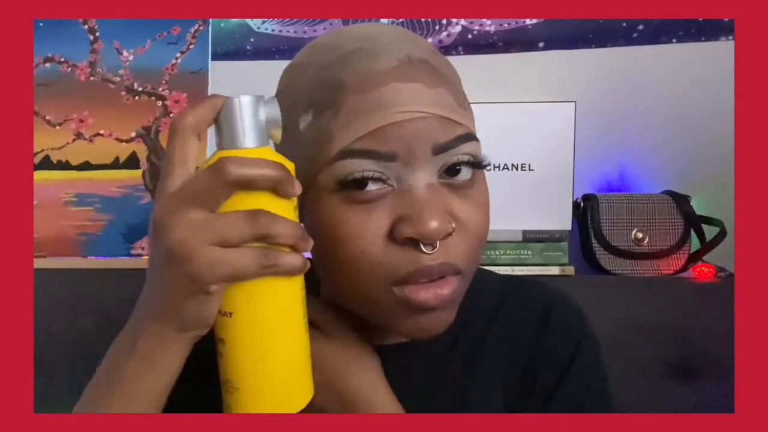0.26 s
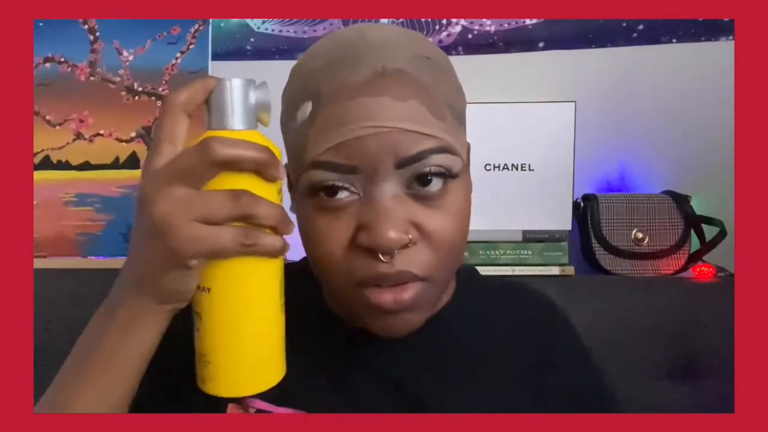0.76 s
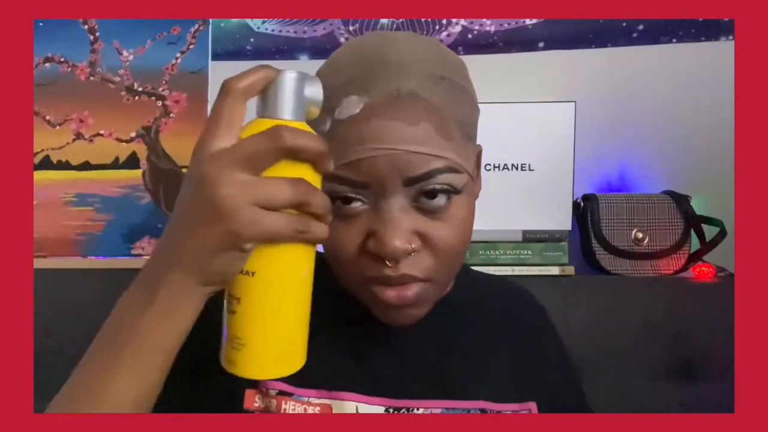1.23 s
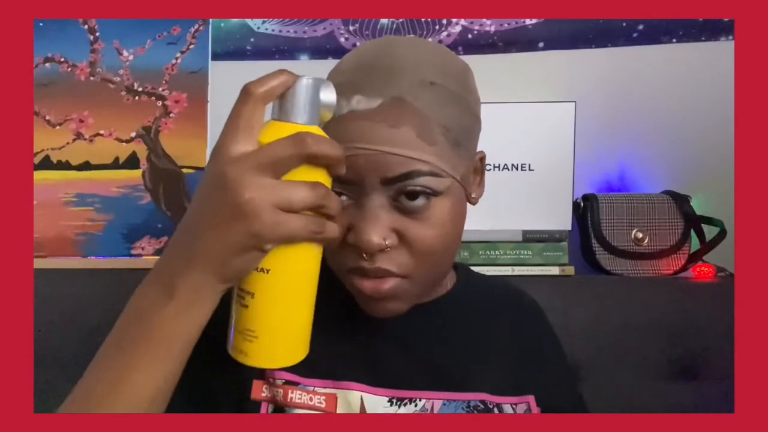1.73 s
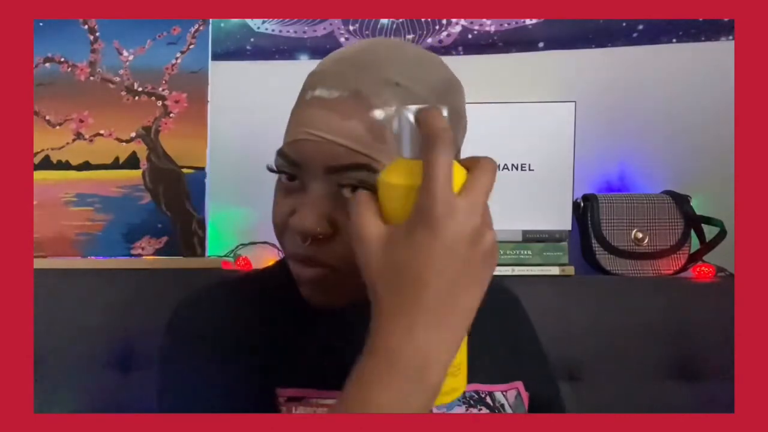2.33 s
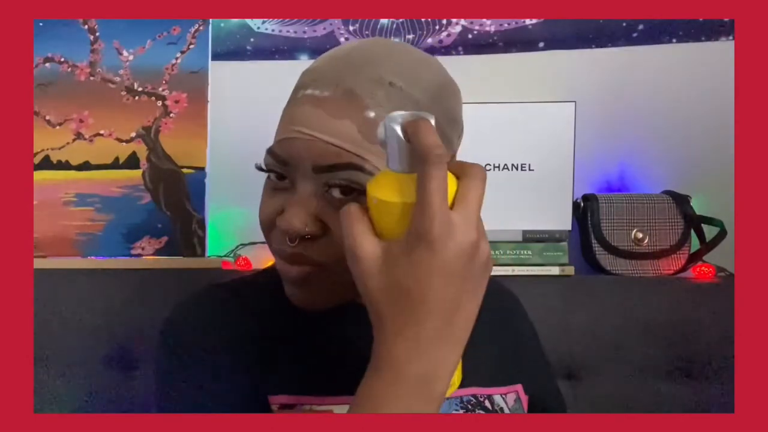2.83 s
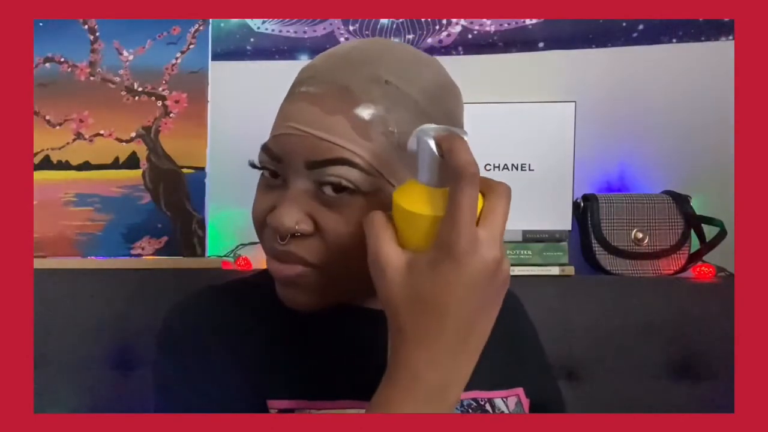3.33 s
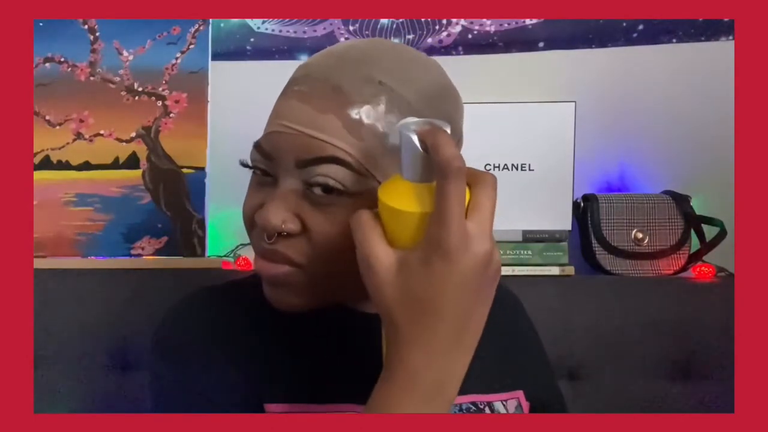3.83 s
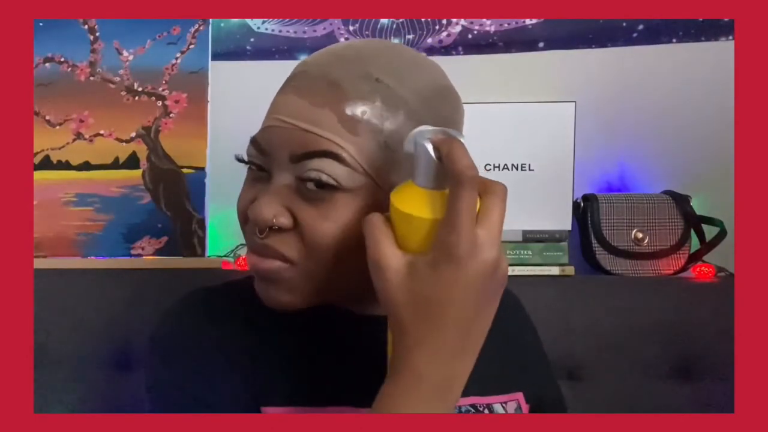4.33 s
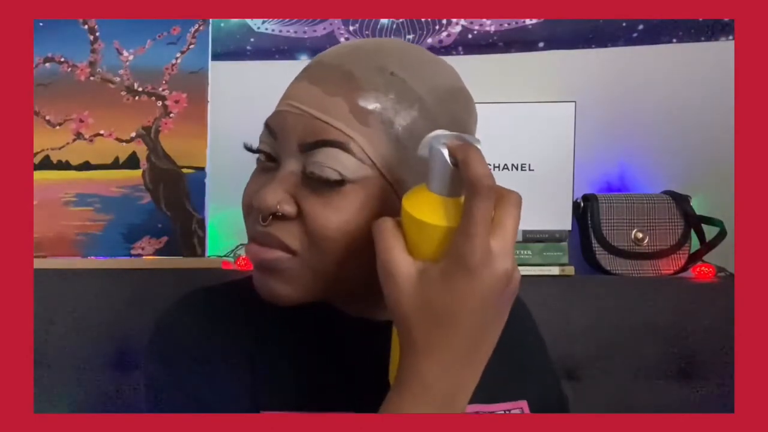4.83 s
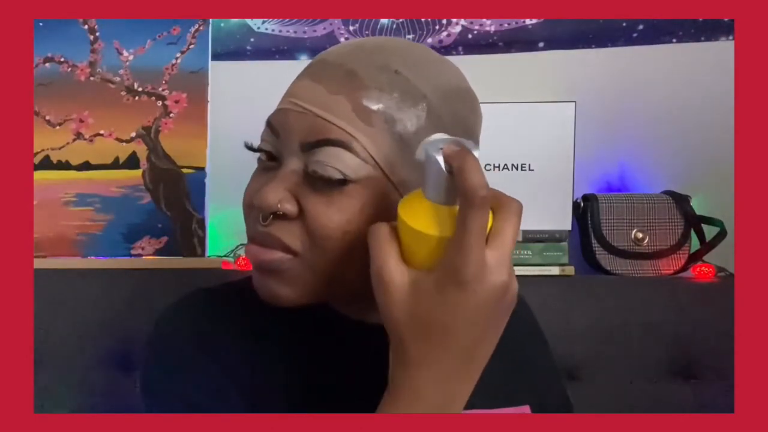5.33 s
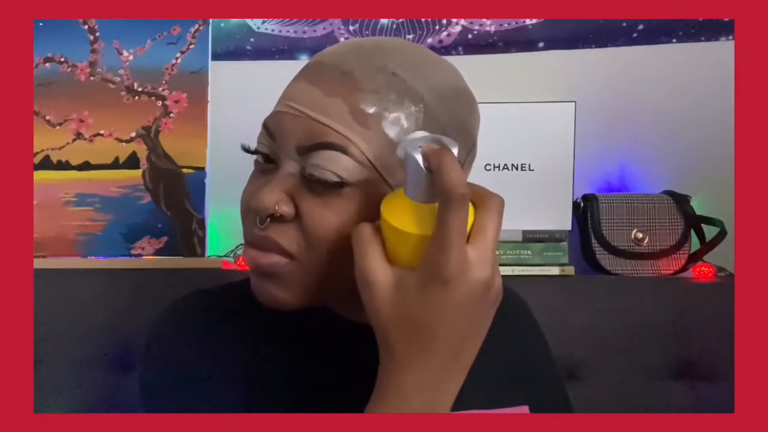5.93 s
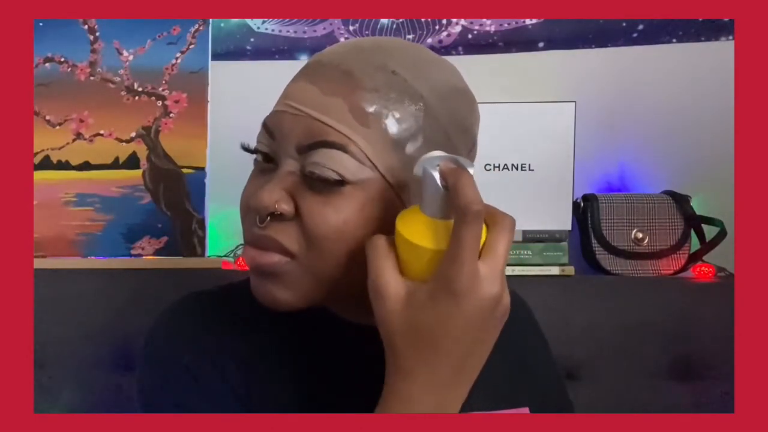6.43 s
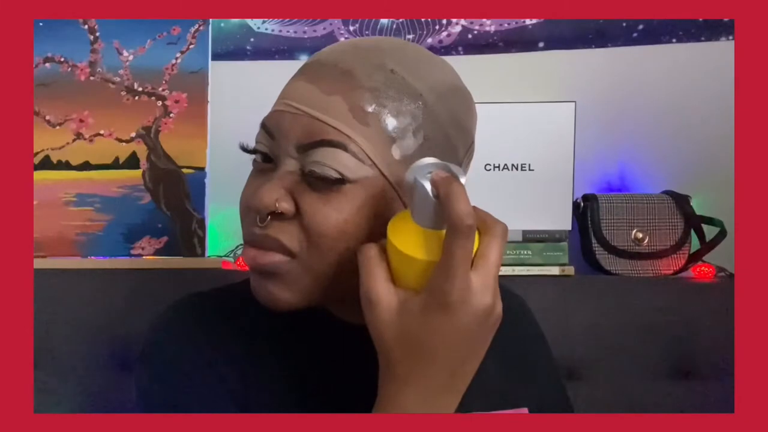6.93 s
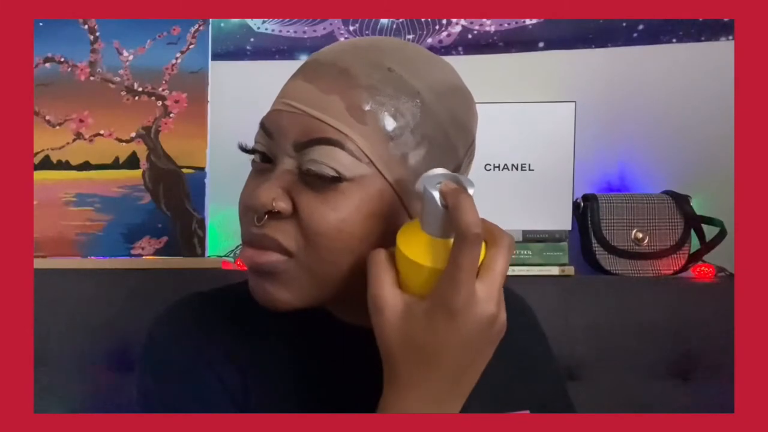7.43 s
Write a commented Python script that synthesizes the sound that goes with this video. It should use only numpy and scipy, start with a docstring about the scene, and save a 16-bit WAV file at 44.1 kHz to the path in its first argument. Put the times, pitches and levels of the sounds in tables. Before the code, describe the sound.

An aerosol can sprays in rapid short hissing spurts, close by in a quiet room, with a few faint finger ticks.

```python
"""An aerosol can sprayed in quick short spurts against a head, close to a pair of microphone ports. Each press
opens the valve at once: the nozzle hisses and sizzles, then the jet swells and roars on the scalp, and the
hollow under the button rings. The hand carries the can across the head, then lowers it towards the ear; button
and fingers tick on the can. The place is a quiet furnished room with a low rumble; once, after a knock, the can
rings on with a faint low tone."""
import sys
import numpy as np
from scipy import signal
from scipy.fft import rfft, irfft
from scipy.io import wavfile

SR = 44100
rng = np.random.default_rng(int(sys.argv[2]) if len(sys.argv) > 2 else 0)


def pcm_store(signal):
    """Save signal as 16-bit PCM."""
    levels = np.round(np.clip(np.atleast_2d(signal), -1, 1) * 32767)
    wavfile.write(sys.argv[1], SR, levels.astype(np.int16).T)


N = 338688

# Presses of the button. Each row: start in seconds, hiss at the opening in dB, swell time in seconds,
# swollen hiss in dB, seconds until the finger lifts, sag until then in dB, roar top against hiss in dB,
# share of the press at which the roar tops, sizzle against hiss in dB, then dB for each aim band.
BUTTON_PRESSES = [(-0.06, -55, 0.037, -40, 0.15, 4.5, -3.5, 0.75, -5, -5.5, -1, -3),
                  (0.238, -61, 0.036, -51, 0.11, 6.5, -8.5, 0.98, -4.5, -1, -3, -1),
                  (0.425, -54, 0.031, -41, 0.14, 2, -1.5, 0.48, -4, -4.5, -1, 2),
                  (0.696, -62, 0.039, -63.5, 0.051, 9.0, -17.5, .5, -3, -2.5, 6.5, -3),
                  (0.857, -55, 0.043, -37.5, 0.17, 3.5, -5.5, 0.39, -5, 6, 9.5, 4),
                  (1.126, -51.5, 0.063, -45, 0.12, 1, -2.5, 0.61, -4, 0, 5, 2.5),
                  (1.365, -58, 0.05, -43, 0.15, 4.5, -1, 0.65, -2.5, -2.3, 2, 4),
                  (1.624, -56, 0.054, -43, 0.13, 2, -2.5, 0.69, -5, -0.5, 1.5, 5),
                  (1.865, -59.5, 0.048, -49.5, 0.12, -3.5, 0.5, 0.96, -4, -6.5, -1.5, 2),
                  (2.246, -62.5, 0.067, -44, 0.14, 6.5, -6.5, 0.66, -7, -7, -1, 6.5),
                  (2.561, -59, 0.069, -47, 0.13, 4, -6, .8, -6, -9.5, -5.5, -2),
                  (2.897, -59.5, 0.048, -40.5, 0.14, 4.5, -3.1, 0.57, -4.5, -8.5, -3, 4),
                  (3.197, -58.5, 0.077, -52.5, 0.13, 3, -6.5, 0.71, -0.5, -1.5, 0.5, 1),
                  (3.424, -61, 0.05, -45.5, 0.16, 0, -0.3, 0.59, -5, -3.5, 0, 7),
                  (3.712, -62, 0.061, -42, 0.18, 3.5, -1.5, 0.52, -4.5, -4, -1, 5),
                  (4.041, -58, 0.069, -46, 0.13, 1.5, -2.5, 0.84, -1.5, -3.5, -3, 3),
                  (4.299, -59.5, 0.063, -40, 0.14, 2, -5, 0.65, -10.5, 4, 3, 3),
                  (4.582, -58, 0.06, -52.5, 0.16, -4.5, -0.5, 0.92, -3, 0, 3, 0.5),
                  (4.99, -47, 0.065, -42.5, 0.15, 3, -0.6, 0.39, -7.5, 1, 5, 3),
                  (5.294, -57.5, 0.078, -41, 0.17, 4.5, -4, 0.64, -4.5, 0.3, 0, 4),
                  (5.566, -52.5, 0.048, -39, 0.15, 2, -4.5, 0.57, -10, 2, 0, 4.5),
                  (5.846, -54, 0.06, -36.5, 0.14, 5.5, -8, 0.71, -10.5, 0.5, -4, 2.5),
                  (6.122, -52.5, 0.062, -36.5, 0.15, 3.5, -6.5, 0.57, -11, 0, 0, 4),
                  (6.4, -54.5, 0.045, -39.5, 0.17, 0, -2.5, 0.47, -7.5, 2, 2, -1),
                  (6.705, -55.5, 0.045, -39, 0.18, 2, -5.5, 0.64, -5, 1.5, 2.5, -6.5),
                  (7.118, -47.5, 0.13, -37, 0.17, 4.5, -7, 0.83, -5, 3, 1, -1),
                  (7.423, -56, 0.051, -39.5, 0.15, 1.5, -2.5, 0.65, -3.5, -1.5, 0, 0.5)]
# Colour of the spray at close range. Each row: frequency in Hz, level in dB.
SPRAY_SPECTRUM = [(100, -19.5), (200, -13.5), (300, -8), (500, -6), (800, -1.5), (1750, -3.5),
                  (2000, -10.5), (2600, -11.5), (4100, -6), (5600, -0.5), (6550, -2.1), (7200, 0.38),
                  (8000, -1.4), (8700, 2), (10100, 1), (11300, 2.5), (13400, -3.5), (15500, -0.5)]
# Narrow steady peaks that colour the spray's roar and hiss. Each row: centre in Hz, width in Hz,
# boost in dB.
SPRAY_PEAKS = [(317, 12, 3), (474, 25, 3), (592, 18, 4), (820, 60, 2), (1007, 22, 2.5), (1117, 22, 3),
               (1581, 40, 4), (5500, 90, 1.5), (7294, 60, 2)]
# Bands that change with the aim of each press. Each row: centre in Hz, width in Hz.
AIMED_BANDS = [(7250, 440), (5670, 700), (334, 170)]
# The can crosses the head. Each row: time in seconds, place from 0 (near side) to 1 (far side).
CAN_PATH = [(0, 0.015), (1.2, 0.051), (2, 0.36), (2.6, 0.72), (4.3, 0.73), (6, 1), (7.68, 1)]
# The can sinks towards the ear. Each row: time in seconds, lowering from 0 to 1.
CAN_LOWERING = [(5.9, 0.23), (6.9, 0.28), (7.5, 0.78)]
# Bands that change as the can moves. Each row: centre in Hz, width in Hz, near-side gain in dB,
# far-side gain in dB, dB added when fully lowered.
MOVING_BANDS = [(3370, 700, 3, 1.5, -8), (4470, 720, -1.1, 0.05, -1), (5800, 820, 1.2, 0.2, -1.5),
                (8800, 560, -2.5, -1.5, -9), (11100, 800, -1.5, -2.6, -12), (14500, 2700, -6.5, -3.5, 6)]
# Phase lead of the jet at the right port. Each row: frequency in Hz, radians with the can at the
# near side, radians at the far side.
JET_LEAD = [(0, 0, 0), (1000, .25, .75), (2070, .3, 1.65), (3100, .2, 3.0), (4100, 1.2, 3.0),
            (4800, 2.5, 3.2), (5500, 2.5, 3.3), (6200, 2.1, 5.0), (6500, 1.6, 6.1), (6900, 1.1, 6.5),
            (7600, .25, 6.4)]
# The direct jet at the two ports. Each row: frequency in Hz, likeness from 0 to 1.
JET_LIKENESS = [(100, .6), (400, 0.66), (1000, 0.84), (2000, 0.48), (3100, 1), (4100, 0.61), (5500, 0.87),
                (6300, 0.6), (6900, 0.9), (7600, 0.83)]
# Stereo image of the treble. Each row: frequency in Hz, phase lead of the right side in radians,
# likeness between left and right from 0 to 1.
TREBLE_IMAGE = [(7600, .15, .95), (7750, 0, .993), (8250, 0, .993), (8500, -.5, .92), (8800, -.8, .88),
                (9300, -1.8, .8), (9850, -3.14, 1), (10800, -3.14, 1), (11600, -4.6, .75),
                (12300, -6.0, .97), (12600, -6.28, .9995), (13400, -6.28, .9995), (13700, -6.5, .97),
                (14200, -7.6, .6), (14900, -9.42, .995), (16000, -9.42, 1)]
# Button and fingers on the can. Each row: start in seconds, peak in dB, centre in Hz, decay in ms.
CAN_TICKS = [(.38, -49, 7000, 2), (0.401, -54.5, 890, 16), (0.857, -41, 1510, 3.7), (1.108, -49, 2000, 8.4),
             (2.156, -64.5, 5990, 5.3), (2.488, -61, 640, 13), (2.497, -64, 9000, 3.0),
             (2.512, -65, 590, 12), (2.53, -75, 9000, 3.0), (2.769, -51, 8000, 11), (3.279, -43, 490, 10),
             (4.83, -48, 8000, 4), (4.977, -59, 1500, 8.1), (5.833, -51, 6000, 6), (6.106, -52.5, 6000, 15),
             (7.119, -41.5, 1440, 3.8)]
# The faint low tone after a knock. Each row: time in seconds, level in dB.
DRONE_LEVEL = [(3.28, -100), (3.3, -76), (3.5, -64), (3.75, -73.5), (3.9, -100)]
# Colour of the room tone. Each row: frequency in Hz, level in dB.
ROOM_SPECTRUM = [(20, -65.5), (35, -9), (55, 2.5), (85, -7), (120, -4), (160, -12), (300, -12.5),
                 (600, -21.5), (1700, -28.5), (3000, -32), (8000, -34), (15500, -54)]
# The room's rumble over time. Each row: time in seconds, level in dB.
RUMBLE_LEVEL = [(0, -76.5), (.6, -69), (.8, -73.5), (.95, -70.5), (3.8, -71), (4.3, -73), (5.1, -70.5),
                (6.3, -70), (6.7, -76), (7.68, -72)]
# The room tone at the two ports. Each row: frequency in Hz, likeness from 0 to 1.
RUMBLE_LIKENESS = [(30, 0.93), (100, 0.6), (400, 0.3), (1500, 0), (7000, .05)]

SNAP_S, SNAP_POWER = 0.012, 0.27   # the valve snaps open
RELEASE_DB_PER_S, TAIL_FROM_DB, TAIL_DB_PER_S = 328, 19, 230   # the hiss drops fast, then more slowly
DIFFUSE_DB = 12   # this far under its peak a tail comes from the walls alone
SIZZLE_LEAD_DB, SIZZLE_FADE_DB, SIZZLE_FADE_S = 6, -7.5, .1
ROAR_RISE_DB, ROAR_FALL_DB, ROAR_RELEASE_DB_PER_S = 35, 7, 295
ROAR_TOP_HZ, ROAR_FLOOR_DB, UPPER_ROAR_EASE = 1800, -18, 0.41
CAP_HZ, CAP_WIDTH_HZ, CAP_LINGER_S = 1690, 75, .015
DRONE_HZ, CUTOFF_HZ = 209, 15750
SPAN = 20480   # samples in one spurt, whose time and frequency axes follow
T, HZ = np.arange(SPAN) / SR, np.fft.rfftfreq(SPAN, 1 / SR) + 1e-3


def spurt(start, open_db, swell_s, peak_db, lift_s, sag_db, roar_top_db, top_at, sizzle_held_db, *aim_db):
    """One press, close up: the nozzle's hiss and sizzle, the roar on the scalp and the ringing cap."""
    place = along(CAN_PATH, start)
    pan_db = np.interp(place, [0, 1], [-0.3, -2.0])   # leans right as the can crosses
    colour = spray_colour(place, along(CAN_LOWERING, start), aim_db)
    jet = jet_noise(place)

    snap = np.clip(T / SNAP_S, 0, 1) ** SNAP_POWER
    lifted_s = np.maximum(T - lift_s, 0)
    knee_s = TAIL_FROM_DB / RELEASE_DB_PER_S
    flow_db = np.interp(T, [0, swell_s, lift_s], [open_db, peak_db, peak_db - sag_db])
    flow_db -= RELEASE_DB_PER_S * np.minimum(lifted_s, knee_s)
    flow_db -= TAIL_DB_PER_S * np.maximum(lifted_s - knee_s, 0)
    flow = snap * from_db(flow_db)
    diffuse = np.clip((max(flow_db) - flow_db) / DIFFUSE_DB, 0, 1) * (T > T[np.argmax(flow_db)])

    # The sizzle is ahead at the opening and dies first.
    sizzle_db = along([(0, sizzle_held_db + SIZZLE_LEAD_DB), (swell_s, sizzle_held_db),
                       (lift_s, sizzle_held_db), (lift_s + SIZZLE_FADE_S, SIZZLE_FADE_DB)], T)
    hiss = flow * nozzle_hiss(jet, colour, diffuse, pan_db, sizzle_db)

    # The roar arches over the press, with a floor that follows the flow.
    depth_db = np.where(T < top_at * lift_s, ROAR_RISE_DB, ROAR_FALL_DB)
    arch_db = depth_db * np.interp(T / lift_s, [0, top_at, 1], [-1, 0, 1]) ** 2
    roar_db = peak_db + roar_top_db - arch_db - ROAR_RELEASE_DB_PER_S * lifted_s
    roar_db = np.maximum(roar_db, flow_db + ROAR_FLOOR_DB)
    roar = snap * from_db(roar_db) * scalp_roar(jet, colour, diffuse, pan_db, arch_db)
    return hiss + roar + cap_ring(jet, flow, diffuse, place)


def nozzle_hiss(jet, colour, diffuse, pan_db, sizzle_db):
    """The nozzle's hiss and top sizzle, in seven bands that waver as the hand moves."""
    edges_hz = (ROAR_TOP_HZ, 3000, 4300, 6600, 8100, 10000, 12800)
    slopes = [below(edge) for edge in edges_hz] + [1]
    bands = []
    for k in range(7):
        band = at_ports(jet, colour * (slopes[k + 1] - slopes[k]), diffuse if k < 3 else 0)
        bands.append(band * flutter(db=3, per_s=16.8))
    hiss = sum(bands[:3]) * from_db([[0.24 * pan_db], [-.3 * pan_db]]) + sum(bands[3:5])
    hiss *= flutter(db=0.86, per_s=59.3) / band_rms(colour, HZ, 6670, 9140)
    sizzle = sum(bands[5:]) * flutter(db=1.2, per_s=60) / band_rms(colour, HZ, 12350, 14700)
    return hiss + sizzle * from_db(sizzle_db)


def scalp_roar(jet, colour, diffuse, pan_db, arch_db):
    """The jet roars on the scalp; its upper part comes earlier and stays longer."""
    shape = colour * below(ROAR_TOP_HZ)
    shadow = below(1150, power=6)   # the head shades the left port most in the lows
    lower = at_ports(jet, shape * shadow, diffuse) * from_db([[pan_db], [-pan_db]])
    upper = at_ports(jet, shape * (1 - shadow), diffuse) * from_db(UPPER_ROAR_EASE * arch_db)
    return (lower + upper) * flutter(db=2.06, per_s=37.5) / band_rms(colour, HZ, 300, 1615)


def cap_ring(jet, flow, diffuse, place):
    """The hollow under the button rings on after the flow, fainter from the far side."""
    resonance = bump(CAP_HZ, CAP_WIDTH_HZ)
    pole = np.exp(-1 / (CAP_LINGER_S * SR))
    lingering = signal.lfilter([1 - pole], [1, -pole], flow)
    ring = at_ports(jet, resonance, diffuse) / band_rms(resonance, HZ, 0, SR)
    return ring * lingering * from_db(np.interp(place, [0, 1], [-15, -34.5]))


def spray_colour(place, lowered, aim_db):
    """Gain over frequency: narrow steady peaks, and bands that follow the can's position and aim."""
    colour_db = at_hz(SPRAY_SPECTRUM, HZ)
    for centre, width, db in SPRAY_PEAKS:
        colour_db += db * bump(centre, width)
    for centre, width, near_db, far_db, lowered_db in MOVING_BANDS:
        colour_db += (near_db + place * (far_db - near_db) + lowered * lowered_db) * bump(centre, width)
    for (centre, width), db in zip(AIMED_BANDS, aim_db):
        colour_db += db * bump(centre, width)
    return from_db(colour_db)


def jet_noise(place):
    """Three noise spectra: the direct jet at the left and right ports, and its return off the walls."""
    lead_hz, *leads = np.transpose(JET_LEAD)
    near, far = (np.exp(1j * np.interp(HZ, lead_hz, lead)) for lead in leads)
    link = ((1 - place) * near + place * far) * at_hz(JET_LIKENESS, HZ)
    left, right = port_pair(0.99, stereo_link(HZ, link), SPAN)
    walls = rfft(rng.standard_normal(SPAN))
    return np.array([left, right, walls])


def at_ports(jet, shape, diffuse):
    """One band of the jet in stereo; as diffuse nears 1 the right port hears only the walls."""
    left, right, walls = irfft(shape * jet)
    return np.array([left, np.sqrt(1 - diffuse ** 2) * right + diffuse * walls])


def flutter(db, per_s):
    """A gain that wavers at random along one spurt, with a spread of about db."""
    knots = rng.standard_normal(128)
    return from_db(db * np.interp(T * per_s, np.arange(128), knots))


def button_tick(peak_db, centre_hz, decay_ms):
    """Button or finger on the can: a short puff of noise about two octaves wide."""
    t = np.arange(2048) / SR
    age = 1000 * t / decay_ms
    puff = rng.standard_normal(len(t)) * np.exp(-age) * (1 - np.exp(-4 * age))
    band_hz = [centre_hz / 2, min(centre_hz * 2, .45 * SR)]
    left = signal.sosfilt(signal.butter(1, band_hz, "band", fs=SR, output="sos"), puff)
    link = stereo_link(np.fft.rfftfreq(len(t), 1 / SR), 1)
    right = irfft(rfft(left) * link / abs(link))
    return from_db(peak_db) / abs(left).max() * np.array([left, right])


def room_tone():
    """The room behind the can: low rumble and faint hiss, plus the brief low tone the can rings with after a
    knock."""
    hz, t = np.fft.rfftfreq(N, 1 / SR) + 1e-3, np.arange(N) / SR
    colour = from_db(at_hz(ROOM_SPECTRUM, hz))
    link = stereo_link(hz, at_hz(RUMBLE_LIKENESS, hz))
    rumble = irfft(port_pair(colour, link, N), N) / band_rms(colour, hz, 35, 110)
    drone = from_db(along(DRONE_LEVEL, t)) * np.sin(2 * np.pi * DRONE_HZ * t)
    return rumble * from_db(along(RUMBLE_LEVEL, t)) + drone


def stereo_link(hz, low_link):
    """Phase lead and likeness between left and right: low_link below, the treble image above."""
    image_hz, lead, alike = np.transpose(TREBLE_IMAGE)
    treble_link = np.interp(hz, image_hz, alike) * np.exp(1j * np.interp(hz, image_hz, lead))
    return np.where(hz < image_hz[0], low_link, treble_link)


def port_pair(gain, link, size):
    """Spectra of noise at both ports; link is their complex likeness."""
    shared, apart = rfft(rng.standard_normal((2, size)))
    return gain * np.array([shared, link * shared + np.sqrt(1 - np.minimum(abs(link), 1) ** 2) * apart])


def from_db(db):
    """Gain of a level in dB."""
    return 10 ** (np.asarray(db) / 20)


def along(points, seconds):
    """A time table read between its rows."""
    return np.interp(seconds, *np.transpose(points))


def at_hz(points, hz):
    """A spectrum table read on a log-frequency axis."""
    row_hz, values = np.transpose(points)
    return np.interp(np.log(hz), np.log(row_hz), values)


def bump(centre_hz, width_hz):
    """Spectral bell of height 1."""
    return np.exp(-.5 * ((HZ - centre_hz) / width_hz) ** 2)


def below(edge_hz, power=12):
    """Low-pass gain curve."""
    return 1 / (1 + (HZ / edge_hz) ** power)


def band_rms(gain, hz, low_hz, high_hz):
    """Rms of unit white noise through gain, inside a band."""
    return np.sqrt(np.sum(gain[(hz > low_hz) & (hz < high_hz)] ** 2) / len(hz))


def add(out, sound, start_s):
    """Mixes sound into out from start_s on."""
    i = round(start_s * SR)
    out[:, max(i, 0):i + sound.shape[1]] += sound[:, max(-i, 0):N - i]


def scene():
    """Spurts and ticks close to the microphone, over the room tone."""
    out = room_tone()
    for press in BUTTON_PRESSES:
        add(out, spurt(*press), press[0])
    for start, *tick in CAN_TICKS:
        add(out, button_tick(*tick), start)
    return out


def record(dry):
    """The top is cut steeply."""
    return signal.sosfilt(signal.ellip(12, .5, 70, CUTOFF_HZ, fs=SR, output="sos"), dry)


dry = scene()
out = record(dry)
pcm_store(out)
```